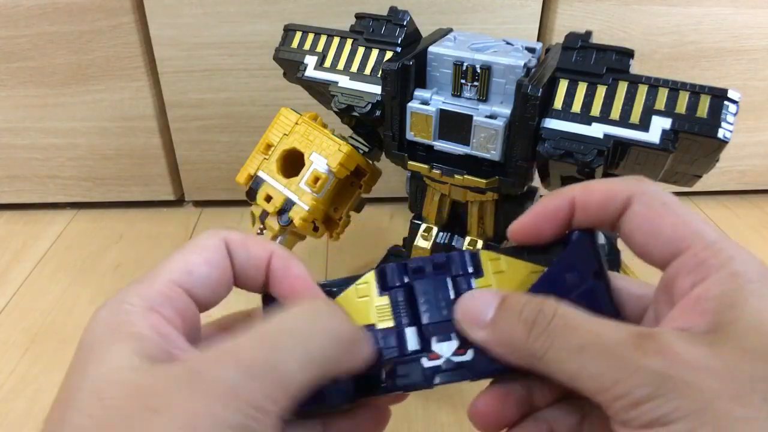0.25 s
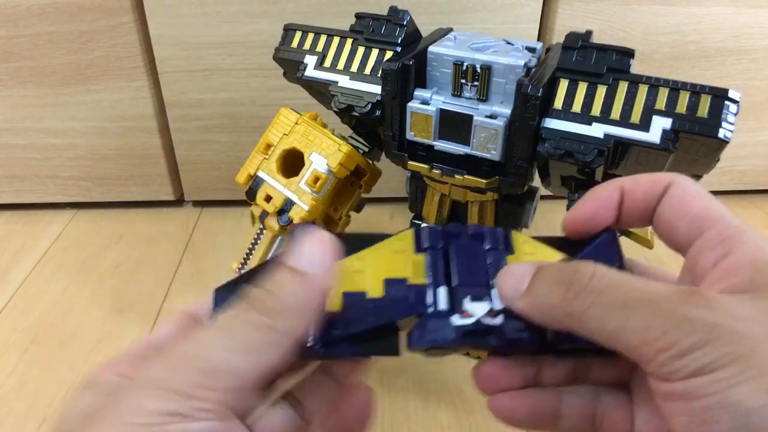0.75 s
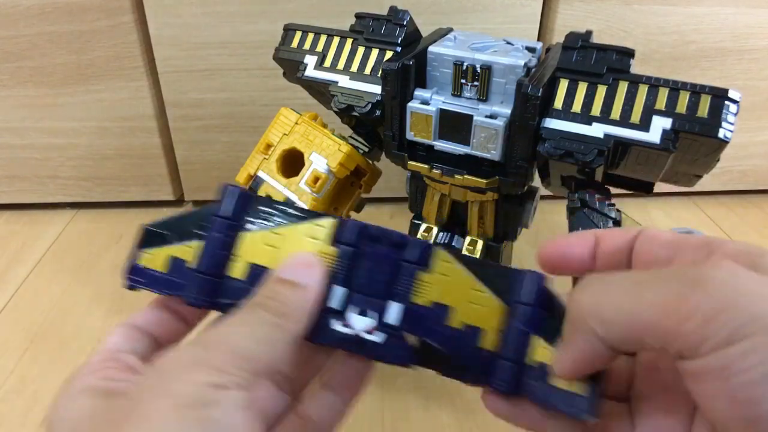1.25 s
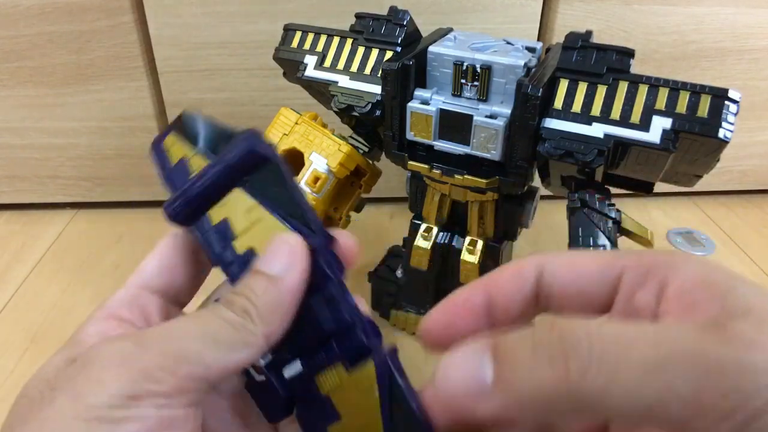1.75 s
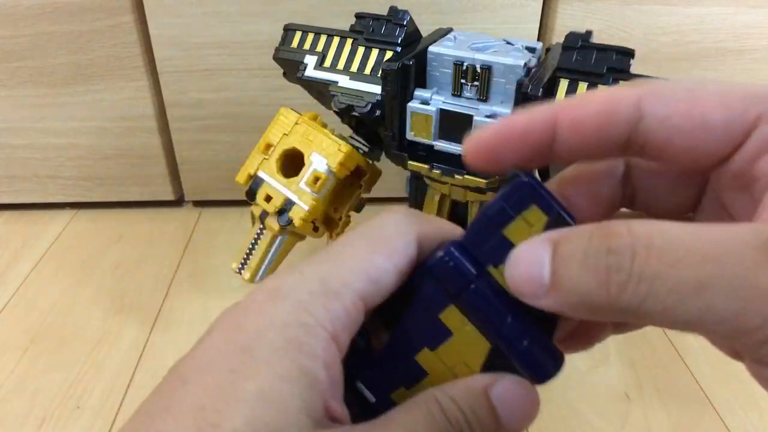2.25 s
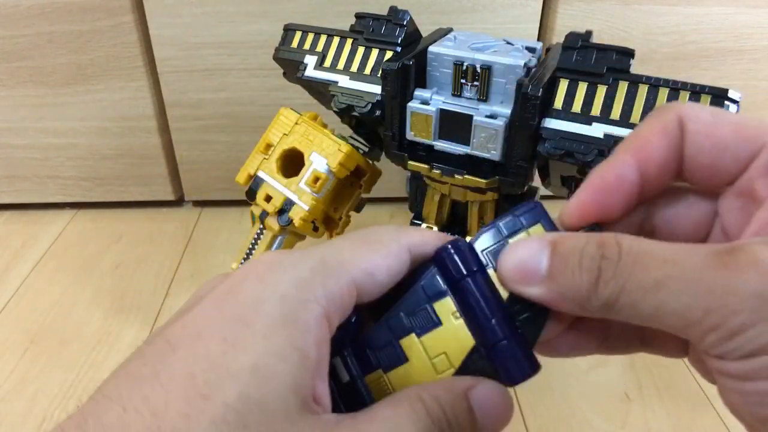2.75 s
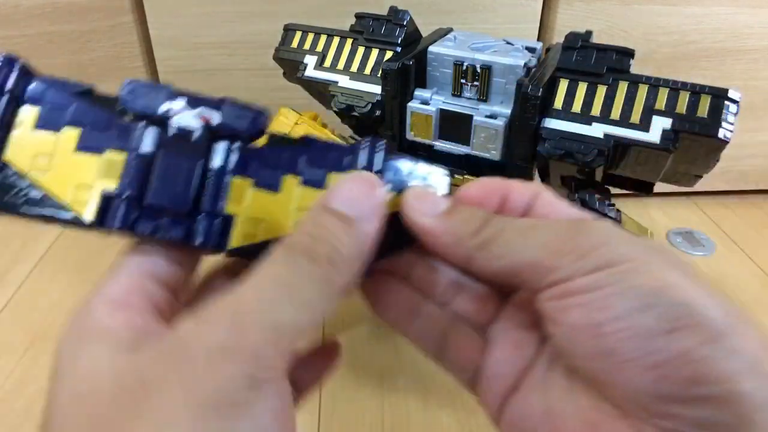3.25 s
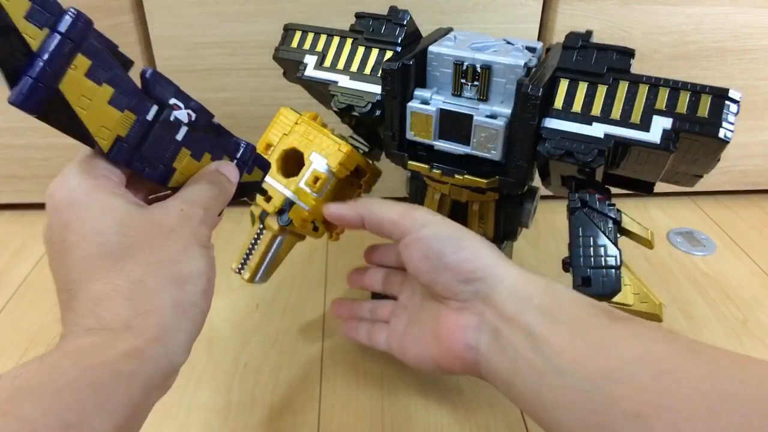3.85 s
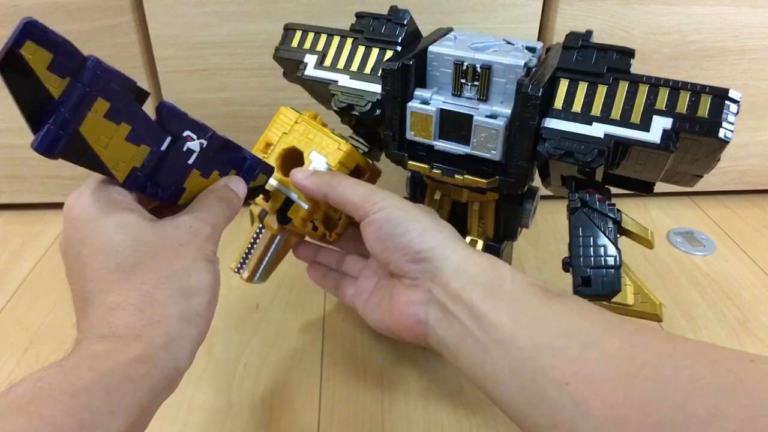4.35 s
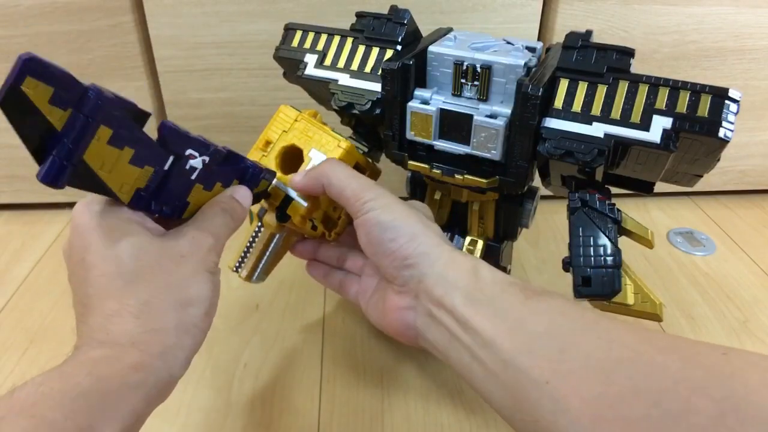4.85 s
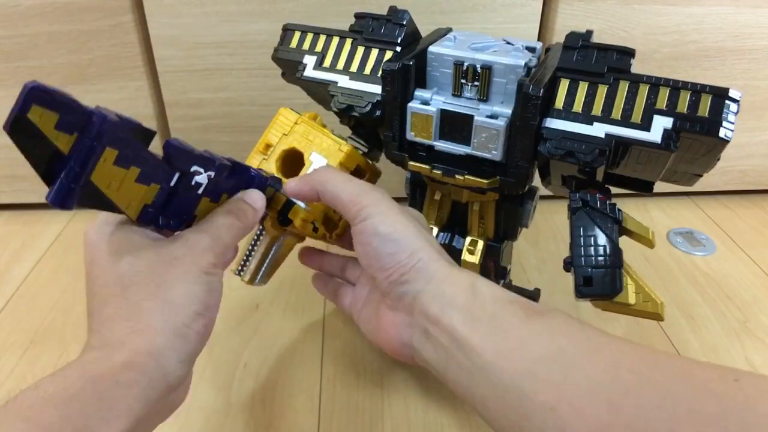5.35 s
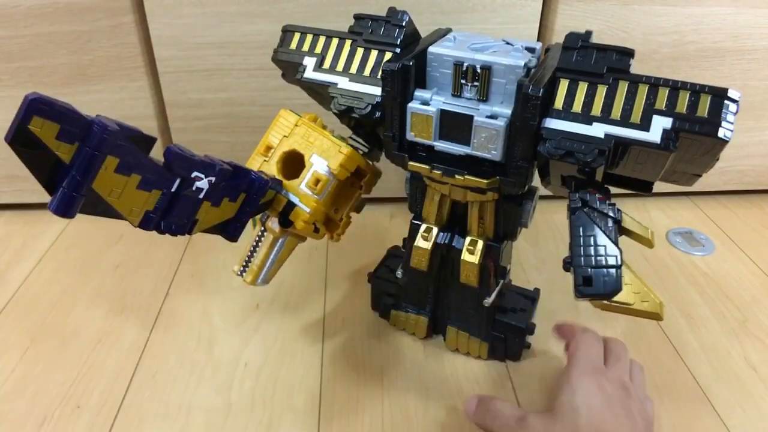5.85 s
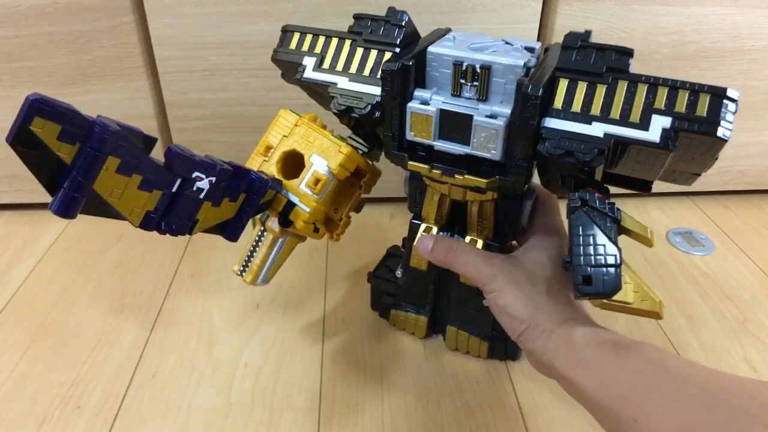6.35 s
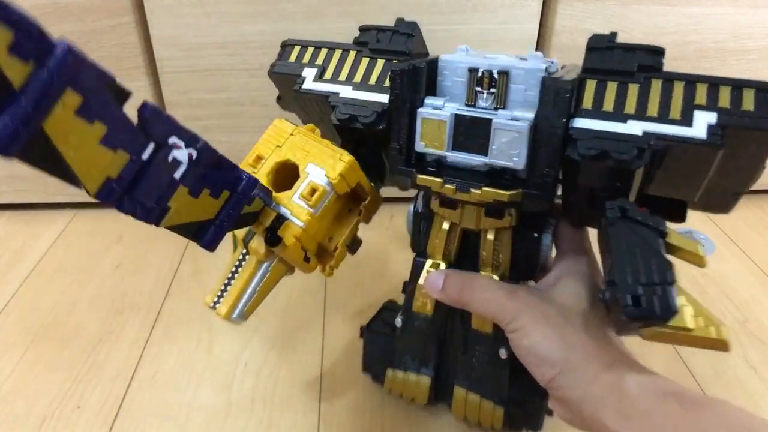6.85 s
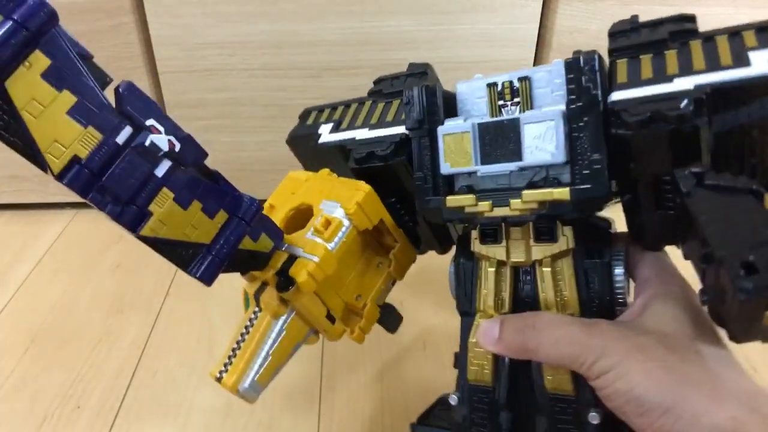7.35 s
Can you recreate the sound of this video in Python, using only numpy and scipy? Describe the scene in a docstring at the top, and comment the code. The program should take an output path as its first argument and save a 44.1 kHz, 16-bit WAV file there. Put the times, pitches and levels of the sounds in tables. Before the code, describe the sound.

Dense bright plastic clicking and grinding thins to scattered snaps, then duller thumps and a short board scrape as a big toy is pressed and moved.

```python
"""Sharp plastic clicks run nearly throughout over quiet air, grinding and rubbing; thuds are strongest from 4 s.
Hands unfold a hard plastic toy part, press it onto a big toy figure on a wooden floor, then slide and lift it.
Clicks ring short plastic modes; pushes ring the boards; streams of tiny ticks make grinding and scraping.
Shaped noise makes skin rubbing, rumble and air. A small room answers and a small microphone listens."""
import sys
import numpy as np
from scipy import signal
from scipy.fft import rfft, irfft, next_fast_len
from scipy.io import wavfile
from scipy.ndimage import uniform_filter1d

SR = 44100
rng = np.random.default_rng(int(sys.argv[2]) if len(sys.argv) > 2 else 0)


def wrap_up_sound(samples):
    """Save the sound to the file named by the first command line argument, as 16-bit audio."""
    columns = np.atleast_2d(samples).T
    # keep every value between -1 and 1, then stretch to whole-number steps
    tamed = np.clip(columns, -1, 1)
    steps = np.round(tamed * 32767).astype(np.int16)
    wavfile.write(sys.argv[1], SR, steps)


N = 334701


def amp(db):
    """Turns decibels into a plain gain."""
    return 10 ** (np.asarray(db) / 20)


def rms_one(x):
    """Scales a sound to an rms of 1."""
    return x / np.sqrt(np.mean(x ** 2) + 1e-20)


def in_time(rows):
    """Draws straight lines between the rows of a table, one curve for each column after the time."""
    s, *columns = np.transpose(rows)
    return [np.interp(np.arange(N) / SR, s, column) for column in columns]


def at_hz(points, hz):
    """Reads a table between its frequencies, on a logarithmic scale."""
    points = np.array(points)
    return np.interp(np.log(hz), np.log(points[:, 0]), points[:, 1])


def coloured(spectrum):
    """Steady noise with the given spectrum; rms 1."""
    size = next_fast_len(N)
    hz = np.maximum(np.fft.rfftfreq(size, 1 / SR), 1)
    white = rfft(rng.standard_normal(size))
    return rms_one(irfft(white * amp(at_hz(spectrum, hz)), size)[:N])


def flicker(rate, depth_db):
    """A gain that wanders, with a new random goal `rate` times a second."""
    knots = rng.standard_normal(2000)
    return amp(depth_db * np.interp(np.arange(N) / SR * rate, np.arange(len(knots)), knots))


def add(out, sound, s):
    """Mixes a sound in at a time."""
    i = round(s * SR)
    out[i:i + len(sound)] += sound[:N - i]


def fade(t, t60):
    """Dies away by 60 dB in t60 seconds, never quicker than 2 ms."""
    return amp(-60 * t / np.maximum(t60, .002))


def both_db(a_db, b_db):
    """Power sum of two levels."""
    return 10 * np.log10(amp(2 * a_db) + amp(2 * b_db))


def lingering(events, t60):
    """Level in dB that jumps by each event's peak power and dies away; powers add."""
    power = np.zeros(N)
    for s, peak_db, *_ in events:
        power[round(s * SR)] += amp(2 * peak_db)
    keep_per_sample = amp(-2 * 60 / (t60 * SR))
    return 10 * np.log10(signal.lfilter([1], [1, -keep_per_sample], power + 1e-18) + 1e-14)


# What is handled colours each blow. Stages in order: the folded part in both hands, the part unfolded,
# pressed onto the figure, the pressure let go, the figure gripped by a leg, slid on the boards, tipped, lifted.
# Columns: start t/s, basic low body of contacts level/dB, change to upper board modes level/dB,
# ring time relative to the bare shell [times]
HANDLING_STAGES = [(0, -29.5, -5.5, 1.15), (1.45, -19.5, -6.5, 1.3), (4.05, -16, 2, 1.9),
                   (5.42, -17.5, -7.5, 1.8), (6.15, -10.5, 1.5, 2.3), (6.45, -14.5, -5.5, 1.6),
                   (6.8, -8.5, -6.5, 1.66), (7.05, -14, 8, 1.5)]


def handled(s):
    """The colour columns in force at a time."""
    return [colour for start, *colour in HANDLING_STAGES if start <= s][-1]


def low_body_db(s, peak_db, centre_hz):
    """Low body of a contact from what is handled; higher and harder contacts carry less of it."""
    pitch_db = -22.5 * np.log2(centre_hz / 3800)   # per octave
    force_db = -0.2158 * (peak_db + 22.5)
    return handled(s)[0] + pitch_db + force_db


# Heavily damped modes of the plastic shell. Columns: f/Hz, basic level/dB
SHELL_MODES = [(620, -7), (850, -3), (1140, 0.5), (1400, 2), (1900, -0.5), (2200, -1), (2450, 2.5),
               (2900, 1.5), (3250, 1.15), (3600, 1.5), (3900, 0), (4200, 2.5), (4600, 4.5), (4950, -2),
               (5270, -1), (5760, 2.5), (6300, -1), (7000, -2), (8200, -3), (9600, 1), (10900, -7),
               (11700, 5), (12500, -2.5), (13200, 3), (13900, -3), (14600, 0.5), (15300, 2.5)]
RING_T60_S, RING_SLOPE = 0.0049, 0.26   # bare-shell ring time at 4 kHz, and how much longer low modes last


def shell_ring(centre_hz, body_db, treble_db, luck, lasting=1):
    """One touch rings every shell mode with its own strength; the modes near its centre lead."""
    hz, mode_db = np.transpose(SHELL_MODES)
    t = np.arange(round(.03 * SR))[:, None] / SR
    lead_db = -9 * np.abs(np.log2(hz / centre_hz))
    brightness = np.clip(np.log2(hz / 6000) / 0.95, 0, 1)   # the treble takes over above the main modes
    upper_db = lead_db + brightness * (treble_db - lead_db)
    band_db = np.where(hz < 1500, body_db, upper_db)
    strength = amp(mode_db + band_db + 2.7 * luck[0])
    detuned = hz * (1 + 0.05 * luck[1])   # the grip and the struck spot shift the modes
    phase = np.pi * np.arange(len(hz)) + .5 * luck[2]   # neighbouring modes start in opposite senses
    t60 = lasting * RING_T60_S * (4000 / hz) ** RING_SLOPE
    rings = strength * fade(t, t60) * np.sin(2 * np.pi * detuned * t + phase)
    return rings.sum(axis=1) * np.minimum(t[:, 0] / 0.00027, 1)


# Spectrum shape of room air and hiss. Columns: f/Hz, relative level/dB (per Hz)
AIR_SPECTRUM = [(20, -32), (35, -6.5), (65, 0.37), (120, -12.5), (250, -14), (450, -23.5), (1000, -27),
                (4000, -42.5), (12000, -28.5), (16500, -39)]


def quiet_air():
    """Steady noise shaped like room air and hiss."""
    return amp(-62.5) * coloured(AIR_SPECTRUM)


# Hands moving over the plastic, before shaking is added and each layer is trimmed.
# Columns: t/s, skin rubbing level/dB, grinding level/dB
HAND_MOVES = [(0, -66, -58), (.12, -85, -66), (.23, -51, -51), (.6, -69.5, -57), (.85, -85, -72),
              (1.16, -61, -57), (1.5, -74.5, -67.5), (2.0, -77.5, -70.5), (2.24, -64, -71.5),
              (2.43, -83, -73.5), (2.97, -74, -72), (3.08, -53.5, -54.5), (3.3, -56.5, -58),
              (3.61, -58, -70), (4.1, -64, -78), (4.5, -63.5, -67), (5.22, -68, -64.5), (5.5, -57.5, -76),
              (5.7, -60, -70), (5.9, -58, -56.5), (6.11, -54, -67.5), (6.4, -63, -63), (6.68, -50, -49),
              (6.81, -57.5, -68), (6.88, -53, -51), (7.08, -60.5, -70.5), (7.59, -61, -62.5)]
SHAKE_DB, SHAKE_T60_S = -36.5, 0.43   # loose joints shake on: level for a 0 dB contact, and die-away
SHAKE_HISS_DB = -11.5   # hiss of the shaking, relative to its grinding


def hand_levels():
    """Rubbing and grinding levels: hand movement plus loose joints that shake on after each contact."""
    rub_db, grind_db = in_time(HAND_MOVES)
    shake_db = lingering(CONTACTS, SHAKE_T60_S) + SHAKE_DB
    return both_db(rub_db, shake_db + SHAKE_HISS_DB), both_db(grind_db, shake_db)


def deal_ticks(ticks, spots, centre_hz, body_db, treble_db, lasting=1):
    """Deals a stream of ticks at random to spots of the shell, each ringing in its own way."""
    dealt, out = rng.integers(0, spots, N), np.zeros(N)
    for k, own in enumerate(rng.standard_normal((spots, 3, len(SHELL_MODES)))):
        ring = shell_ring(centre_hz, body_db, treble_db, own, lasting)
        out += signal.oaconvolve(ticks * (dealt == k), ring)[:N]
    return rms_one(out)


def grinding(level_db):
    """Joints and fingers grind over the shell in a dense stream of ticks; harder grinding is more uneven."""
    uneven = np.clip((level_db + 59.5) / 9, .15, 1.3)
    happens = rng.random(N) < 3500 / SR   # ticks per second
    size = amp(8.3 * uneven * np.minimum(rng.exponential(1, N), 4))
    ticks = happens * size * rng.choice([-1, 1], N)
    ticks = ticks / np.sqrt(uniform_filter1d(ticks ** 2, size=4000) + 1e-9)   # evens out the slow level
    sound = deal_ticks(ticks, 12, 3800, -24.0, -16.5)
    return amp(level_db - 8.5) * sound * flicker(60, 4.5) ** uneven


# Spectrum shape of skin rubbing on plastic. Columns: f/Hz, relative level/dB (per Hz)
RUB_SPECTRUM = [(900, -30), (2000, -11.5), (4000, -1), (8000, -8.5), (13500, -4), (16500, -2)]


def rubbing(level_db):
    """Skin rubs the plastic: shaped noise with a gently wandering level."""
    return amp(level_db - 6.0) * coloured(RUB_SPECTRUM) * flicker(14, 1.7)


# Plastic contacts. Columns: t/s, middle-band peak level/dB before trim, centre f/Hz,
# treble level/dB relative to the leading modes, time for the chatter to fall 60 dB [ms]
CONTACTS = [(0.0487, -30, 4200, -25, 60), (.059, -17, 4480, -1, 4.1), (.122, -24, 3580, -15, 16),
            (.153, -27.5, 3960, -11, 20), (.162, -26, 4460, -19, 7), (.169, -27.5, 4660, -6.5, 32),
            (0.174, -19, 5710, -34, 8.2), (0.1918, -29.5, 4010, -15, 7), (.2037, -20, 5000, 1.5, 5.4),
            (.2194, -42, 4600, -11, 9), (0.237, -38, 3820, -31, 14), (.255, -31.5, 3620, -16, 36),
            (0.2613, -23.5, 4120, -1, 6.3), (0.2917, -34, 3040, -10, 68), (.305, -5, 4466, -3, 37),
            (0.309, -7, 4197, -27, 19), (.3477, -38.5, 3730, -3, 32), (0.3682, -31, 3940, -29, 19),
            (0.4218, -37, 3160, -25, 38), (0.457, -26.5, 4300, -7, 16), (0.4707, -32, 3360, -6, 39),
            (.488, -7, 3750, 1.5, 14), (0.5421, -22.5, 4640, -8, 12), (.575, -21, 4600, -2, 6.4),
            (0.588, -26.5, 3100, -25, 27), (0.6, -34, 3140, -18, 14), (0.607, -30, 3440, -20, 33),
            (0.6202, -23.5, 4160, -4, 28), (.633, -30.5, 3580, -22, 11), (.641, -28.5, 3600, -8, 19),
            (0.701, -39, 3580, -28, 15), (0.7222, -35.5, 3430, -28, 9.2), (.7314, -39.5, 3900, -6, 9.5),
            (.7762, -24.5, 4070, -21, 21), (0.8078, -33, 3800, -24, 30), (0.851, -27.5, 4180, -3, 19),
            (.8823, -20.5, 4500, -9.5, 32), (.9218, -42, 4160, -21, 14), (0.9387, -27, 4250, -13, 19),
            (0.946, -20, 6000, 2, 9.1), (0.9788, -22.5, 5180, -3, 19), (1.0235, -15.5, 4410, 1, 11),
            (1.0337, -33.5, 4930, -3, 21), (1.049, -26, 4530, -28, 39), (1.0625, -24, 4330, -3, 9.6),
            (1.0893, -25, 4410, -9, 8), (1.125, -31, 4894, -5, 7.2), (1.1418, -30.5, 4150, -19, 15),
            (1.1532, -24.5, 4650, 1, 17), (1.161, -24, 4430, -21, 12), (1.1792, -37.5, 4042, -44, 21),
            (1.1944, -11, 3780, -8, 8.2), (1.2114, -5, 4760, 2.2, 19), (1.2156, -5.5, 4550, -6, 26),
            (1.2217, -8, 4010, -19, 9.4), (1.2851, -19, 4212, -24, 9.4), (1.3081, -23, 4250, -6, 6),
            (1.319, -26, 4200, -7, 11), (1.331, 0.2, 5240, -5.5, 24), (1.3886, -27, 4780, -2, 31),
            (1.518, -35, 3630, -10, 35), (1.5223, -29, 3270, -14, 36), (1.5799, -21, 3330, -11, 36),
            (1.6053, -32, 3320, -11.5, 28), (1.686, -40, 3690, -4.5, 23), (1.8183, -31, 3530, -5.5, 11),
            (1.9215, -26.5, 3370, -17, 27), (1.9545, -33, 3480, -29, 9.1), (1.9704, -33.5, 3750, -10, 11),
            (2.194, -51, 4300, -21, 8), (2.269, -50.5, 3390, -25.5, 8), (2.3805, -31, 3750, -1.5, 18),
            (2.3868, -40.5, 3300, -18, 12), (2.4101, -19, 4130, 3.5, 21), (2.445, -12, 2925, -3.5, 6.8),
            (2.5256, -14.5, 4230, -7.5, 9.5), (2.5361, -14.5, 3292, -7, 13), (2.5622, -20.5, 3510, -8, 21),
            (2.5668, -28.5, 3860, -1, 11), (2.589, -26, 3320, -13.5, 7.6), (2.6238, -25.5, 3160, -21, 9.2),
            (2.6312, -37, 3860, -19, 8.8), (2.649, -27, 3676, -6, 11), (2.68, -37.5, 4130, -8.5, 6),
            (2.6935, -33.5, 3724, -13, 9.5), (2.7029, -3.5, 4350, -8.5, 15), (2.84, -26, 4100, -7, 8.3),
            (2.8465, -27.5, 3970, -25.5, 9), (2.8622, -43, 3600, -24, 15), (2.9566, -47.5, 2510, -15, 8),
            (3.2592, -30.5, 3150, -13.5, 29), (3.2764, -25, 3790, -13, 22), (3.2909, -20, 5140, -12.5, 12),
            (3.3067, -28, 4440, -7, 7.9), (3.3788, -18.5, 3930, 1.5, 14), (3.4257, -26.5, 3650, -4, 43),
            (3.441, -26.5, 3430, -11.5, 45), (3.605, -30.5, 3600, -17, 13), (4.1287, -22.5, 3700, -7, 28),
            (4.193, -22, 3430, -4, 83), (4.201, -31, 3270, 7, 60), (4.268, -43, 2660, -14, 48),
            (4.4192, -25.5, 3570, -17, 50), (4.4295, -18, 3120, -4.5, 21), (4.441, -18, 3100, -16, 53),
            (4.5198, -28.5, 3530, -23, 54), (4.611, -23, 3880, -8.5, 21), (4.746, -45, 3870, -18, 24),
            (4.788, -20.5, 3700, -14, 93), (4.799, -23, 4170, -7.5, 43), (4.8234, -8, 3720, -4.5, 35),
            (4.859, -30, 3457, -1, 68), (4.906, -27, 4740, -2, 57), (4.9124, -31.5, 4210, -15, 16),
            (4.936, -16.5, 3900, -10, 75), (4.9467, -2.5, 3240, -4.5, 32), (4.95, -10, 3380, -5, 88),
            (4.9675, -15.5, 3193, -15, 80), (4.9844, -19, 3560, -13, 60), (4.994, -22.5, 4340, -15.5, 48),
            (5.003, -23.5, 4030, -12, 120), (5.0384, -26, 3520, -16, 34), (5.0815, -26.5, 3900, -20, 17),
            (5.1236, -35, 4340, 0, 18), (5.1706, -44, 2870, -24, 26), (5.253, -28.5, 4000, -26.5, 45),
            (5.2686, -15.5, 3630, -2, 66), (5.2874, -25.5, 3660, -21, 33), (5.3358, -14, 3160, -18, 21),
            (5.363, -28.5, 3560, -14, 57), (5.397, -38, 3760, -4, 45), (5.5275, -48.5, 4390, -11, 20),
            (6.1368, -36.5, 4260, -3, 11), (6.1697, -11.5, 2980, -20, 69), (6.2603, -41, 2470, -22, 49),
            (6.298, -36.5, 2755, -27, 33), (6.312, -39, 3780, -10, 22), (6.3477, -29, 3010, -20, 50),
            (6.394, -34, 3320, -24, 37), (6.421, -41.5, 2970, -29, 58), (6.447, -45, 3900, -9, 30),
            (6.5023, -14, 4030, -7, 43), (6.5719, -38.5, 3000, -18, 60), (6.7203, -26.5, 3600, -32, 36),
            (6.736, -14, 3860, -13, 16), (6.8406, -33, 3140, -28, 120), (6.874, -35.5, 3306, -21, 180),
            (6.9137, -23.5, 2850, -18, 26), (6.971, -36.5, 3600, -23, 64), (7.0955, -22, 3570, -14, 46),
            (7.194, -56.5, 2630, -22.5, 12.4), (7.2888, -42.5, 3840, -19, 41),
            (7.336, -15, 3630, -15.5, 44), (7.3503, -17, 3140, -19, 23), (7.3653, -15, 4030, -8, 73),
            (7.3725, -8.5, 3760, -7, 26), (7.388, -27, 3900, -13, 93), (7.424, -40, 2470, -25, 30),
            (7.5044, -18, 3350, -13.5, 19)]
TOUCHES_PER_S, SPOTS = 4000, 3   # tiny rebounds inside one contact, over all spots; spots of the shell


def clicks():
    """Each contact is a first blow and a dying chatter of rebounds, dealt to three spots of the shell.

    Returns what reaches the microphone and what spreads to the walls."""
    out, spread, t = np.zeros(N), np.zeros(N), np.arange(round(.06 * SR)) / SR
    luck = rng.standard_normal((len(CONTACTS), SPOTS, 3, len(SHELL_MODES)))
    chance = rng.random((len(CONTACTS), SPOTS, len(t)))
    sizes = rng.standard_normal(chance.shape)
    middle = signal.butter(2, [1500, 7000], "band", fs=SR, output="sos")
    for contact, spots, draws, size in zip(CONTACTS, luck, chance, sizes):
        s, peak_db, centre_hz, treble_db, t60_ms = contact
        colour = centre_hz, low_body_db(s, peak_db, centre_hz), treble_db
        happens = draws < TOUCHES_PER_S / SPOTS / SR
        touches = happens * size * amp(-2) * fade(t, t60_ms / 1000)
        touches[0, 0] = 1   # the first blow
        lasting = handled(s)[2]
        sound = sum(signal.fftconvolve(touch, shell_ring(*colour, spot, lasting))
                    for touch, spot in zip(touches, spots))
        peak = np.abs(signal.sosfilt(middle, sound)).max()   # levels go by the peak of the middle band
        add(out, amp(peak_db - 0.5) * sound / peak, s)
        # Summed over all directions, the uneven modes partly average out.
        all_round = shell_ring(*colour, spots.mean(axis=0))
        same_energy = np.linalg.norm(sound) / np.linalg.norm(all_round)
        add(spread, amp(peak_db - 1.0) * all_round * same_energy / peak, s)
    return out, spread


# Pushes that reach the floor boards. Columns: t/s, basic level/dB, f/Hz
PUSHES = [(.302, -45.5, 153), (1.214, -46, 98), (2.213, -51.5, 52.1), (2.528, -40, 117), (2.695, -51, 218),
          (3.254, -54.5, 65), (4.132, -36, 263), (4.198, -27.5, 158), (4.258, -38.5, 161),
          (4.425, -27, 136), (4.47, -43, 144.4), (4.523, -36.5, 158), (4.607, -42, 121),
          (4.733, -39.5, 173), (4.787, -42, 292), (4.82, -26.5, 129), (4.948, -21, 110),
          (5.009, -33.5, 244), (5.145, -42.5, 171), (5.187, -39.5, 47), (5.265, -31, 165),
          (5.34, -35, 233.7), (5.378, -31, 156.2), (5.449, -49.5, 91.5), (5.623, -45.5, 109),
          (6, -44.5, 70), (6.169, -36, 194), (6.316, -37.5, 166), (6.348, -38, 116), (6.498, -32, 160),
          (6.539, -31, 128), (6.626, -41, 132), (6.673, -34.5, 163), (6.837, -27.5, 140),
          (6.87, -33.5, 131), (6.967, -35.5, 159), (7.09, -49, 48.7), (7.346, -55, 306),
          (7.497, -48.5, 293.6)]
# Board modes that every push also rings. Columns: f/Hz, basic level/dB, time to fall 60 dB [s]
BOARD_MODES = [(59.55, -22.5, .15), (124, -7, 0.027), (241, -7.5, 0.077), (376, -20, 0.078),
               (516.5, -15, 0.07), (760, -26, 0.0074)]
BOARD_SPREAD_DB, BOARD_DETUNE = 2.5, .025   # change from push to push: level, and share of the frequency


def thuds():
    """A soft push: a low swing at its own pitch plus board modes; the feet rock and land twice more, weaker."""
    out, t = np.zeros(N), np.arange(round(.3 * SR)) / SR
    luck = rng.standard_normal((len(PUSHES), 2, len(BOARD_MODES)))
    rocking = rng.uniform(-1, 1, (len(PUSHES), 2, 2))
    for (s, push_db, hz), (strength, spot), rebounds in zip(PUSHES, luck, rocking):
        upper_db = handled(s)[1]
        swing = fade(t, .08) * np.sin(2 * np.pi * hz * t)
        for (board_hz, board_db, board_t60), chance, shift in zip(BOARD_MODES, strength, spot):
            level_db = board_db + upper_db * (board_hz > 400) + BOARD_SPREAD_DB * chance
            detuned = board_hz * (1 + BOARD_DETUNE * shift)
            swing += amp(level_db) * fade(t, board_t60) * np.sin(2 * np.pi * detuned * t)
        swing = amp(push_db + 2.5) * swing * np.minimum(t / 0.0046, 1)   # soft start
        add(out, swing, s)
        for delay, size in rebounds:
            add(out, 0.5 * size * swing, s + 0.022 + 0.015 * delay)
    return out


# Spectrum shape of the rumble. Columns: f/Hz, relative level/dB (per Hz)
RUMBLE_SPECTRUM = [(24, -49.5), (40, -11.5), (140, 4.5), (219, -12.5), (282, -8.5), (371, -25.5),
                   (450, -21.5), (580, -46.5), (990, -120)]
# The figure sliding on the boards. Columns: t/s, scrape level/dB
SLIDING = [(6.13, -84), (6.22, -53.5), (6.35, -59.5), (6.52, -57.5), (6.6, -58), (6.71, -53), (6.8, -76),
           (6.87, -59), (7.05, -87)]
SLIDE_RUMBLE_DB = 5   # rumble above the scrape
# The feet rock on after a push: levels relative to the push, and times to fall 60 dB.
ROCK_DB, ROCK_T60_S, ROCK_SCRAPE_DB, ROCK_SCRAPE_T60_S = -15, 0.45, -23.5, 0.15
GRIT_PER_S, GRIT_SPREAD_DB = 1100, 4   # scrape grains, and how much their sizes differ
GRIT_LASTING = 5   # the big figure rings longer than the bare shell [times]


def dragging():
    """Feet judder on the boards: lumpy rumble and gritty scrape through the figure's low modes."""
    slide_db, = in_time(SLIDING)
    rumble_db = both_db(slide_db + SLIDE_RUMBLE_DB, lingering(PUSHES, ROCK_T60_S) + ROCK_DB)
    scrape_db = both_db(slide_db, lingering(PUSHES, ROCK_SCRAPE_T60_S) + ROCK_SCRAPE_DB)
    happens = rng.random(N) < GRIT_PER_S / SR
    size = amp(GRIT_SPREAD_DB * np.minimum(rng.exponential(1, N), 3))
    grains = happens * size * rng.choice([-1, 1], N)
    scrape = deal_ticks(grains, 5, 2100, 2.6, -31.5, GRIT_LASTING)
    rumble = amp(rumble_db) * coloured(RUMBLE_SPECTRUM) * flicker(30, 5.3)
    return rumble + amp(scrape_db) * scrape * flicker(130, 3)


# How long the room rings. Columns: f/Hz, time to fall 60 dB [s]
ROOM_RING = [(150, 0.32), (1000, .22), (4000, .16), (13000, 0.18)]
ROOM_DB, ECHO_S, ECHO_DB = -12.5, .0032, -11.5   # level of the tail; delay and level of the floor bounce


def room(x):
    """A bounce off the floor, and a diffuse tail that dies band by band."""
    t, tail = np.arange(round(.4 * SR)) / SR, 0
    edges = 100 * 2. ** np.arange(0, 7.6, .75)
    for low, high in zip(edges, edges[1:]):
        band_filter = signal.butter(2, [low, high], "band", fs=SR, output="sos")
        band = signal.sosfilt(band_filter, rng.standard_normal(len(t)))
        tail = tail + band * fade(t, at_hz(ROOM_RING, np.sqrt(low * high)))
    tail = tail * np.clip((t - .003) / 0.0073, 0, 1)
    tail = amp(ROOM_DB) * tail / np.sqrt(np.sum(tail ** 2))
    tail[round(ECHO_S * SR)] += amp(ECHO_DB)
    return signal.oaconvolve(x, tail)[:N]


def scene():
    """Everything the hands do, the room's answer and the quiet air."""
    rub_db, grind_db = hand_levels()
    direct_clicks, spread = clicks()
    handling = grinding(grind_db) + thuds()
    answer = room(spread + handling)
    mix = quiet_air() + rubbing(rub_db) + direct_clicks + handling + dragging() + answer
    return mix[None]


# The microphone's two humps and one dip. Columns: f/Hz, width [Hz], gain level/dB
MICROPHONE_HUMPS = [(4700, 5300, 5), (8690, 5240, -9.5), (13660, 960, 9.5)]


def record(dry):
    """The microphone's bass cut, humps and dip, rounded peaks, then the top is cut."""
    dry = signal.sosfilt(signal.butter(2, 45, "high", fs=SR, output="sos"), dry)
    for hz, width_hz, gain_db in MICROPHONE_HUMPS:
        w, lift = 2 * np.pi * hz / SR, np.sqrt(amp(gain_db))
        a = np.tan(np.pi * width_hz / SR)
        above = [1 + a * lift, -2 * np.cos(w), 1 - a * lift]
        below = [1 + a / lift, -2 * np.cos(w), 1 - a / lift]
        dry = signal.lfilter(above, below, dry)
    dry = .95 * np.tanh(dry / .95)
    top_cut = signal.ellip(10, .5, 85, 15900, fs=SR, output="sos")   # cutoff in Hz
    return signal.sosfilt(top_cut, dry)


dry = scene()
out = record(dry)
wrap_up_sound(out)
```